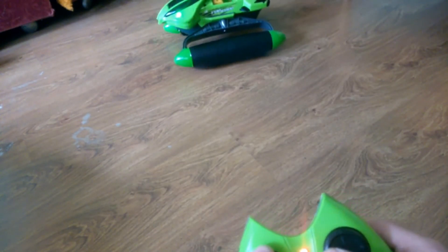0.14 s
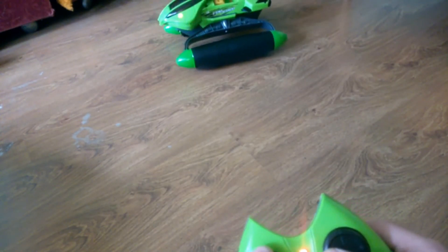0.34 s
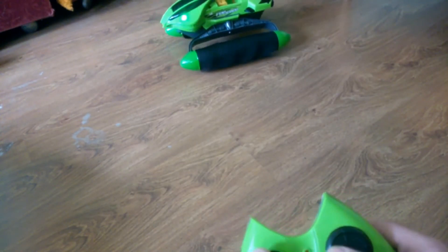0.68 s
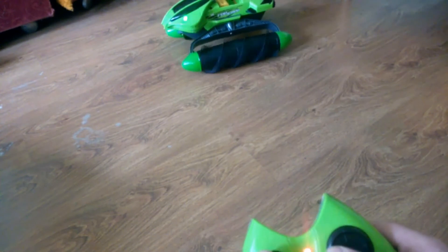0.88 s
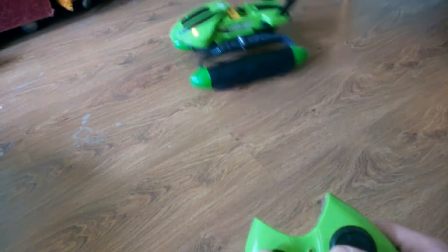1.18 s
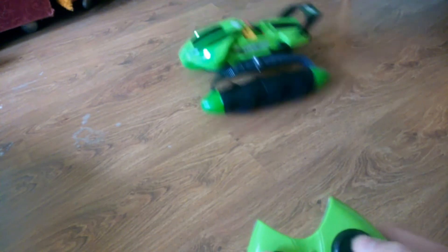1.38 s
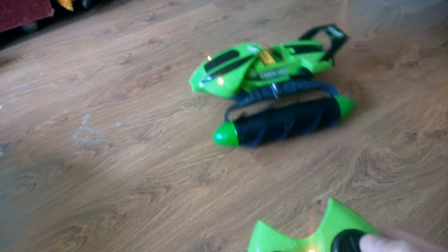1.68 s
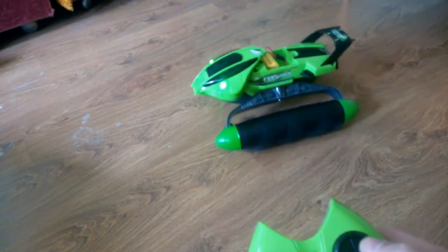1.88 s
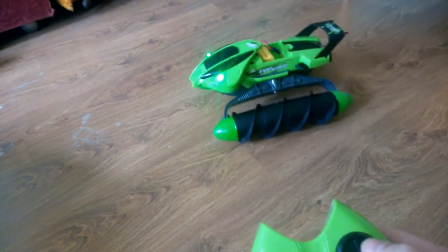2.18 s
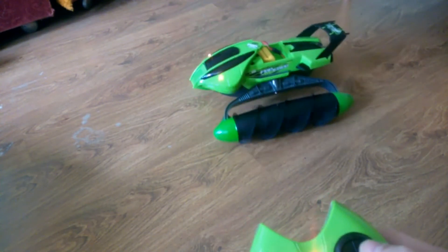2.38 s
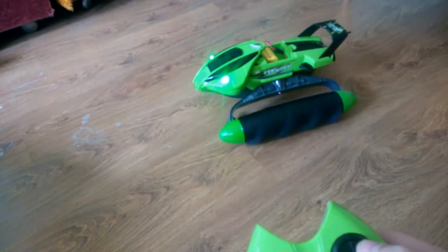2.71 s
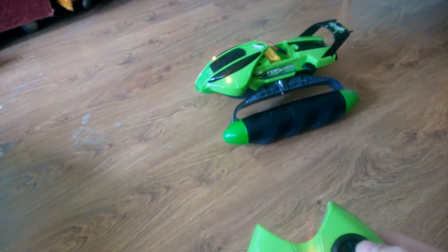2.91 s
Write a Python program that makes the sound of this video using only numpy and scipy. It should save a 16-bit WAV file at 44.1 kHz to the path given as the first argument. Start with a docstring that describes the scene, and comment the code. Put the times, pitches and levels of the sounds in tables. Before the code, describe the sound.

A toy car's hollow drums rattle and scrape on wooden floorboards, already running at 0 s with faint high gear whine, fading by 0.95. A controller click at 1.0 starts a second run, strongest near 1.25, weakening to a whine by 1.7. Another click, then a short, louder run from 1.8 to 2.15. Near quiet; click at 2.5, loud run until 2.95, last click at 3.02 as another begins. Small room, low background noise.

```python
"""A toy car's two hollow ridged drums run on a wooden floor in a small room: knock-modulated
friction noise excites boards, shell and gearbox, and sine tones make a faint gear whine.
The first run dies away by 1 s; a click of the hand-held controller, struck modes of its case,
leads to a second run with a lower gear tone too. After a click at 1.7 s comes a short third run,
then a faint narrow noise hiss; a click at 2.5 s, a fourth run and a last click as a fifth begins."""
import sys
import numpy as np
from scipy import signal
from scipy.fft import rfft, irfft, next_fast_len
from scipy.io import wavfile

SR = 44100
rng = np.random.default_rng(int(sys.argv[2]) if len(sys.argv) > 2 else 0)


def volts(x):
    """Linear amplitude factor 10**(x/20) for a level x in dB, scalar or array-like."""
    e = np.asarray(x, float) / 20
    return 10 ** e


def to_wav(s):
    """Save 16-bit WAV."""
    ch = np.atleast_2d(s).T  # columns
    pcm = np.round(np.clip(ch, -1, 1) * 32767)  # PCM
    wavfile.write(sys.argv[1], SR, pcm.astype(np.int16))


N = 134505


def rms_one(x):
    """Normalisation: equal mean power, with rms 1."""
    return x / np.sqrt(np.mean(x ** 2) + 1e-20)


def in_time(rows):
    """Linear interpolation: the columns of a table against its times."""
    times, *columns = np.transpose(rows)
    return [np.interp(np.arange(N) / SR, times, column) for column in columns]


def drift(rate_hz):
    """Low-passed noise: two equal poles leave a slow random walk about zero, of rms near 1."""
    step = 40   # samples between the slow values
    pole = np.exp(-2 * np.pi * rate_hz * step / SR)
    noise = rng.standard_normal(N // step + 2002)
    slow = signal.lfilter([1], [1, -2 * pole, pole * pole], noise)[2000:]
    return np.interp(np.arange(N) / step, np.arange(len(slow)), rms_one(slow))


def colour(x, spectrum):
    """Spectral shaping: weights each frequency along f/Hz, density/dB points; rms 1."""
    size = next_fast_len(N)
    hz, db = np.transpose(spectrum)
    log_hz = np.log(np.arange(size // 2 + 1) * SR / size + 1)
    gain = volts(np.interp(log_hz, np.log(hz), db))
    return rms_one(irfft(rfft(x, size) * gain, size)[:N])


def resonance(x, hz, width_hz):
    """Damped resonance: a pole pair whose radius sets the bandwidth, gain 1 on top."""
    r = np.exp(-np.pi * width_hz / SR)
    poles = [1, -2 * r * np.cos(2 * np.pi * hz / SR), r * r]
    return signal.lfilter([(1 - r * r) / 2, 0, (r * r - 1) / 2], poles, x)


def ring(clicks, hz, t60):
    """Free vibration: a unit click starts a sine of height 1 that loses 60 dB in t60 seconds."""
    r, w = volts(-60 / (t60 * SR)), 2 * np.pi * hz / SR
    return signal.lfilter([0, np.sin(w)], [1, -2 * r * np.cos(w), r * r], clicks + 1e-18)


def high_pass(x, hz):
    """Fourth-order Butterworth response: attenuates what lies below hz."""
    return signal.sosfilt(signal.butter(4, hz, "high", fs=SR, output="sos"), x)


def dulled(x, leak_db):
    """Microphone response: a steep treble drop, with a high-passed share leaking through."""
    dull_hz = 7900
    low = signal.sosfilt(signal.cheby2(8, 50, dull_hz * 1.12, fs=SR, output="sos"), x)
    return low + volts(leak_db) * high_pass(x, dull_hz)


def background():
    """Stationary noise: the shaped floor of the room, plus one short narrow band of hiss."""
    # spectrum of the room floor: f/Hz, density/dB
    floor_spectrum = [(18, -20), (30, -10), (243, 3), (400, -8), (1030, -7), (4040, -10), (5720, -7),
                      (7740, -25), (10000, -26), (16000, -40)]
    # a faint narrow hiss: start/s, end/s, f/Hz, width/Hz, level/dB
    far_hiss = (2.285, 2.43, 4948, 296, -71)
    start, end, hz, width_hz, hiss_db = far_hiss
    t = np.arange(N) / SR
    gate = np.clip((t - start) / .01, 0, 1) * np.clip((end - t) / .03, 0, 1)
    once = resonance(rng.standard_normal(N), hz, width_hz)
    hiss = rms_one(resonance(once, hz, width_hz))
    floor_db = -64 + 1.1 * drift(8)
    return volts(floor_db) * colour(rng.standard_normal(N), floor_spectrum) + volts(hiss_db) * gate * hiss


def room(x):
    """Reverberation: ten feedback delays, duller on every round as walls absorb treble."""
    t60_s, wall_cut_hz = 0.36, 3300
    size = next_fast_len(N + SR)
    z = np.exp(-2j * np.pi * np.arange(size // 2 + 1) / size)   # one sample of delay
    pole = np.exp(-2 * np.pi * wall_cut_hz / SR)
    wall = (1 - pole) / (1 - pole * z)
    echo = 0
    for k, lag in enumerate((rng.uniform(.008, .03, 10) * SR).astype(int)):
        loop = volts(-60 * lag / SR / t60_s) * wall * z ** lag
        echo = echo + (-1) ** k * loop / (1 - loop)   # sum of all rounds
    return irfft(rfft(x, size) * echo, size)[:N]


def gear():
    """Tooth-meshing tones: two sines whose phase is the integral of a wavering tooth rate."""
    # gear whine: t/s, upper tooth rate f/Hz, upper level/dB rms, lower level/dB rms
    whine = [(0.12, 2520, -67, -80), (.2, 2520, -34, -80), (.28, 2520, -38, -80), (.36, 2520, -49.5, -80),
             (.6, 2520, -37, -80), (.75, 2520, -52, -80), (.9, 2520, -90, -90), (1.44, 2650, -80, -60),
             (1.5, 2580, -50, -43), (1.55, 2560, -47, -45), (1.6, 2500, -54, -45), (1.62, 2370, -54, -56),
             (1.655, 2540, -47, -48), (1.72, 2500, -54, -50), (1.8, 2450, -70, -65), (1.85, 2450, -90, -90)]
    lower_share = .535   # lower tooth rate over the upper one
    hz, upper_db, lower_db = in_time(whine)
    upper_phase = 2 * np.pi * np.cumsum(hz + 6 * drift(6)) / SR   # wavers by 6 Hz rms
    lower_phase = 2 * np.pi * np.cumsum(lower_share * hz + 25 * drift(9)) / SR
    return np.sqrt(2) * (np.sin(upper_phase) * volts(upper_db) + np.sin(lower_phase) * volts(lower_db))


def controller():
    """Modal excitation: button snaps and plastic scuffs set the modes of a small case ringing."""
    # button snaps: t/s, relative level/dB, extra/dB of the modes near 600, 3000, 3400, 4100, 5000 Hz
    button_snaps = [(.9912, -9.5, -1.5, 1.5, 2.5, 0.3, 5), (1.7317, -11, -10, 2.5, -5, 0.3, -1.5),
                    (2.4979, -9, 1.5, -4, 0.3, 1.5, -3), (3.0212, -9, -4, 3, -5, 2.5, -3)]
    # modes of the case: f/Hz, relative level/dB, t60/s
    case_modes = [(594, 0.3, 0.022), (1150, -4, 0.011), (1650, 3, 0.015), (2320, -4, 0.011),
                  (3010, -2.5, 0.015), (3390, -3, 0.012), (4090, -0.3, 0.012), (4700, -8, 0.011),
                  (5150, -6, 0.012), (5720, -4, .013), (6600, -8, 0.011), (7350, -7, 0.011),
                  (9300, -26, .008), (11500, -30, .008)]
    # contacts within one snap: lag/s, relative level/dB
    contacts = [(-.0007, -15), (0, 3), (.0012, -6), (.0027, -7), (.0042, -11)]
    # small ticks of plastic on plastic: t/s, relative level/dB
    plastic_ticks = [(1.0345, -22), (1.5179, -21), (1.7045, -26), (1.8153, -23), (2.0532, -22),
                     (2.5556, -25)]
    case_cut_hz = 400   # the small case radiates no bass
    tick_cut_hz, tick_decay_s = 3500, .002   # a tick is a short scuff
    snaps, ticks, starts = np.zeros(N), np.zeros(N), np.zeros(N)
    for s, db in plastic_ticks:
        starts[int(s * SR)] = volts(db - 12)
    envelope = signal.lfilter([1], [1, -np.exp(-1 / (tick_decay_s * SR))], starts)
    scuff = envelope * rng.standard_normal(N)
    for k, (hz, mode_db, t60) in enumerate(case_modes):
        train = np.zeros(N)
        for s, db, *extras_db in button_snaps:
            extra_db = dict(zip([0, 4, 5, 6, 8], extras_db)).get(k, 0)   # keyed by mode index
            for lag, contact_db in contacts:
                strike_db = db + mode_db + contact_db - 12 + extra_db + rng.normal(0, 1.0)
                train[int((s + lag) * SR)] = volts(strike_db) * rng.choice([-1, 1])
        snaps += ring(train, hz, t60) * (-1) ** k
        ticks += ring(scuff * volts(mode_db - 8), hz, t60)
    snaps = dulled(high_pass(snaps, case_cut_hz), leak_db=-1.5)
    return snaps + dulled(high_pass(ticks, tick_cut_hz), leak_db=-22)


def ridge_knocks():
    """Shot noise: random ridge impacts, each an exponentially decaying pulse; rms 1."""
    # the hardest knocks: t/s, level/dB above a plain knock
    hard_knocks = [(.157, 12), (.269, 10), (.303, 12), (.412, 11), (.523, 11), (.556, 13), (.603, 11),
                   (.665, 12), (.68, 12), (1.064, 13), (1.22, 13), (1.307, 12), (1.924, 13), (2.603, 12),
                   (2.689, 11), (2.747, 12), (2.82, 11)]
    knocks_per_s, spread_db, decay_s = 160, 4.0, 0.0025
    strength_db = spread_db * np.minimum(rng.exponential(1, N), 2)
    hits = (rng.random(N) < knocks_per_s / SR) * volts(strength_db)
    for s, db in hard_knocks:
        hits[int(s * SR)] = volts(db)
    return rms_one(signal.lfilter([1], [1, -np.exp(-1 / (decay_s * SR))], hits))


def resonant_body(force, modes):
    """Modal superposition: parallel resonances of alternating sign, driven by one force."""
    total = 0
    for k, (hz, db, width_hz) in enumerate(modes):
        total = total + (-1) ** k * volts(db) * resonance(force, hz, width_hz)
    return dulled(rms_one(total), leak_db=-14)


def drums():
    """Source and filter: friction noise modulated by ridge knocks drives bodies and surface."""
    # drive of the drums, one table a burst: t/s, then level/dB of the knocking on the boards,
    # drum shell, gearbox rattle, scraping, treble and deep bass
    bursts = [
        [(0.0, -28, -27, -29, -27.5, -46, -58), (0.048, -31, -25, -31.5, -27, -55, -65),
         (0.15, -29, -27.5, -29, -26.5, -48, -52), (0.188, -33, -27.5, -31, -25.5, -48, -68),
         (0.346, -27, -23, -29, -25, -50, -62), (0.408, -31, -26.5, -33.5, -24.5, -47, -79),
         (0.438, -29, -22.5, -29.5, -25.5, -48, -64), (0.62, -29, -24, -31.5, -26, -49, -64),
         (0.675, -29, -23.5, -27.5, -24.5, -47, -64), (0.714, -29, -24.5, -31.5, -25.5, -50, -64),
         (0.872, -40, -34.5, -39.5, -37.5, -68, -90), (0.97, -68, -58, -59, -56.5, -95, -90),
         (0.98, -65, -51, -63, -57, -94, -87)],
        [(1.01, -66, -50, -49, -43, -71, -76), (1.028, -52, -46, -47, -43, -70, -72),
         (1.038, -40, -35, -42, -36, -60, -68), (1.056, -31, -23.5, -37, -31, -55, -64),
         (1.128, -29.5, -26.5, -30.5, -25.5, -50, -63), (1.244, -23, -22, -29.5, -25.5, -45, -53),
         (1.326, -24.5, -25.5, -36.5, -27.5, -49, -59), (1.368, -29, -31, -38, -30.5, -56, -74),
         (1.494, -30.5, -30.5, -42.5, -42.5, -70, -62), (1.546, -36.5, -35, -38, -40, -68, -73),
         (1.604, -34.5, -39.5, -43, -45, -72, -72), (1.69, -42.5, -36.5, -42, -44.5, -73, -87),
         (1.72, -43, -38, -48, -44, -75, -70)],
        [(1.75, -47, -40, -48, -44, -74, -90), (1.802, -48, -44, -52, -50, -84, -83),
         (1.81, -45, -42, -50, -48, -80, -80), (1.826, -32, -33.5, -43, -39, -64, -76),
         (1.862, -24.5, -26.5, -30, -29.5, -50, -56), (1.934, -18.5, -22.5, -28, -24, -46, -46),
         (1.974, -19.5, -24, -32, -30, -53, -62), (2.016, -25.5, -25.5, -32, -29, -52, -48),
         (2.084, -33.5, -35, -39.5, -37.5, -68, -75), (2.174, -49.5, -47, -53.5, -54.5, -90, -84),
         (2.25, -60, -62, -68, -66, -95, -85), (2.322, -68, -70, -82, -75, -97, -85),
         (2.48, -76, -66, -82, -78, -94, -71)],
        [(2.51, -62, -54, -47, -47, -72, -70), (2.53, -50, -47, -42, -43, -69, -67),
         (2.54, -33.5, -32, -36, -37, -61, -65), (2.568, -25.5, -29, -33, -30, -57, -69),
         (2.604, -22, -22, -29, -23.5, -51, -54), (2.624, -19.5, -22.5, -29, -26, -49, -53),
         (2.704, -21, -23, -26, -24.5, -48, -63), (2.732, -21.5, -22.5, -29.5, -25, -45, -58),
         (2.828, -21.5, -21.5, -31, -28, -48, -61), (2.932, -29.5, -36.5, -36.5, -36, -67, -69),
         (2.976, -42, -43.5, -51.5, -48, -77, -79), (3.01, -56, -49, -54, -48.5, -78, -90)],
    ]
    # the next burst begins: same columns
    last_start = (3.035, -56, -50, -50, -45, -70, -80)
    # modes of floor boards, drum shell and gearbox: f/Hz, relative level/dB, width/Hz
    boards = [(59, -36.5, 40), (163, -18.5, 78), (278.6, -1.5, 40.6), (350.4, 1, 41), (394, 0.5, 36.4),
              (460, -2.5, 54)]
    shell = [(568.6, -2.5, 62), (690.5, -0.5, 40), (740, -0.5, 34.5), (830.6, -2, 61), (929.5, -1.5, 42),
             (1040, -4, 88), (1194, -5, 123), (1363, -4.5, 122)]
    gearbox = [(1920, -7, 400), (2330, -0.5, 117), (2520, -0.5, 78), (2686, -1, 132), (2937, -5, 173)]
    # spectra of scraping, treble and deep bass: f/Hz, density/dB
    scrape = [(900, -31), (1600, -4), (2800, -5.5), (3350, 0.5), (3700, -4), (4400, -5.5), (5200, -2),
              (6000, -5), (7100, -8), (7700, -13.5), (8200, -48), (16000, -80)]
    treble = [(6000, -35), (7800, 8), (9000, 8), (10000, 2.5), (11500, -1.5), (12500, -8), (13500, -5.5),
              (14300, -10), (15500, -11), (16500, -42)]
    deep = [(8, -11), (16, 0), (35, -3), (60, -15), (120, -44)]
    # steady rubbing between knocks, one share of 1 a layer
    rub_shares = [0.82, 0.8, 0.74, 0.78, 0.74, .9]
    # the car rocks on its drums: scale of the level flutter/dB, one a layer
    flutters_db = [1.52, 1.07, 1.73, 1.32, 1.1, 0.74]
    knocks = ridge_knocks()
    rocking = drift(8.4)   # common to all layers
    levels = in_time([row for burst in bursts for row in burst] + [last_start])
    layers = [boards, shell, gearbox, scrape, treble, deep]
    mix = 0
    for layer, level_db, share, flutter_db in zip(layers, levels, rub_shares, flutters_db):
        force = rng.standard_normal(N) * (share + (1 - share) * knocks)
        has_modes = len(layer[0]) == 3
        voice = resonant_body(force, layer) if has_modes else colour(force, layer)
        flutter = 0.3 * rocking + 0.67 * drift(23)
        mix = mix + voice * volts(level_db + flutter_db * flutter)
    return mix


def scene():
    """Superposition: direct sound of car and controller, their reverberation and the background."""
    car, hand = drums() + gear(), controller()
    reverberation = volts(-18.5) * room(0.46 * car + 0.85 * hand)
    return (car + hand + reverberation + background())[None]


def low_pass(x):
    """Removes everything above the highest recorded frequency."""
    return signal.sosfilt(signal.butter(12, 16450, fs=SR, output="sos"), x)


def record(dry):
    """Band limitation: a steep Chebyshev low-pass, 50 dB down from 16200 Hz upwards."""
    cut = signal.sosfilt(signal.cheby2(12, 50, 16200, fs=SR, output="sos"), dry)
    return low_pass(cut)


dry = scene()
out = record(dry)
to_wav(out)
```